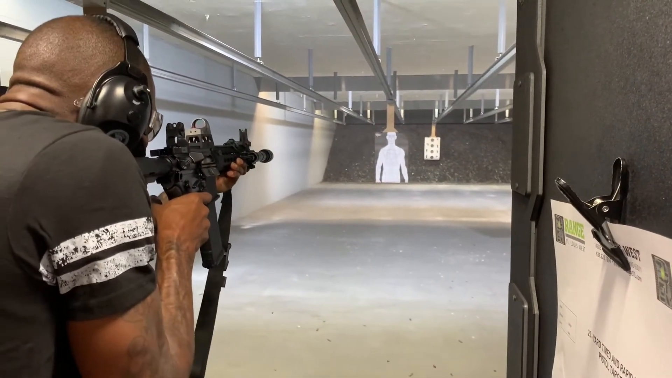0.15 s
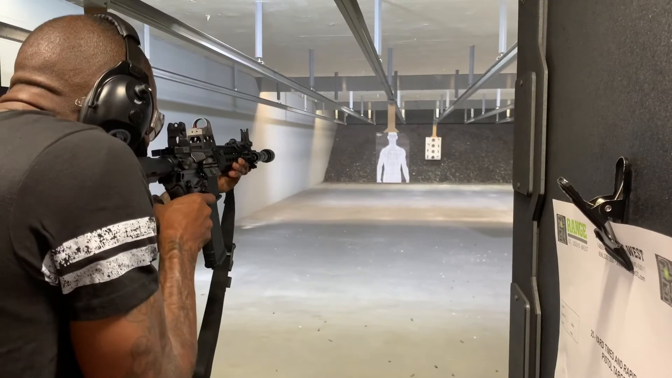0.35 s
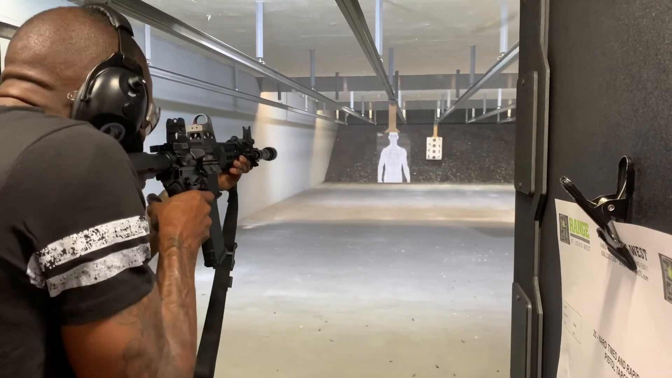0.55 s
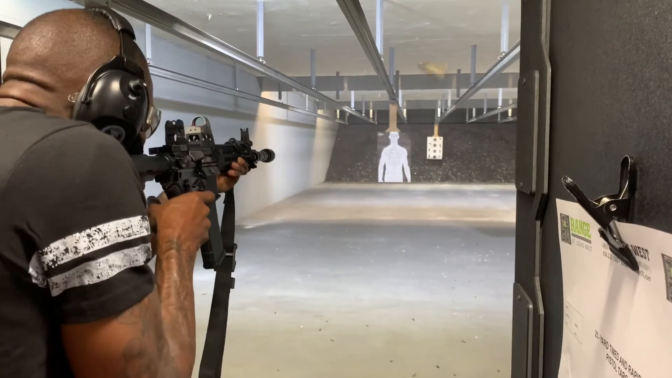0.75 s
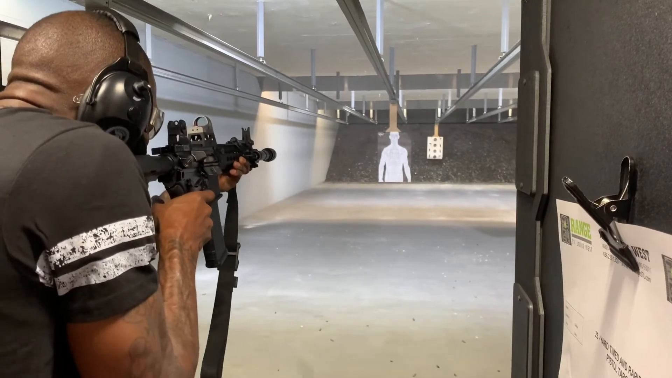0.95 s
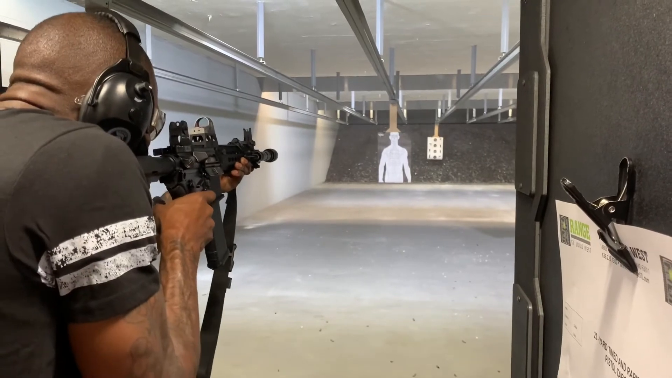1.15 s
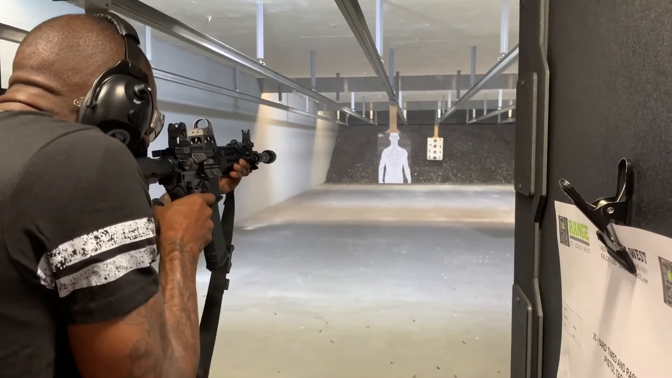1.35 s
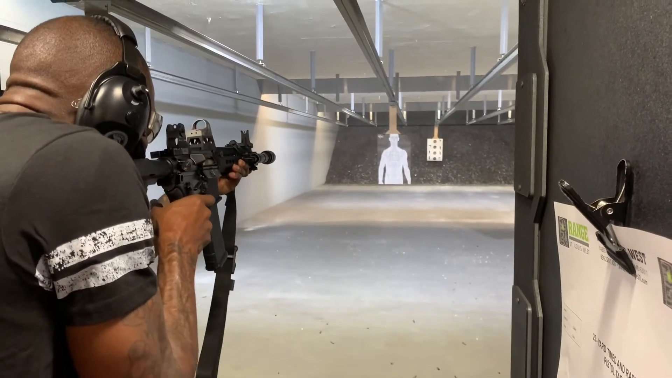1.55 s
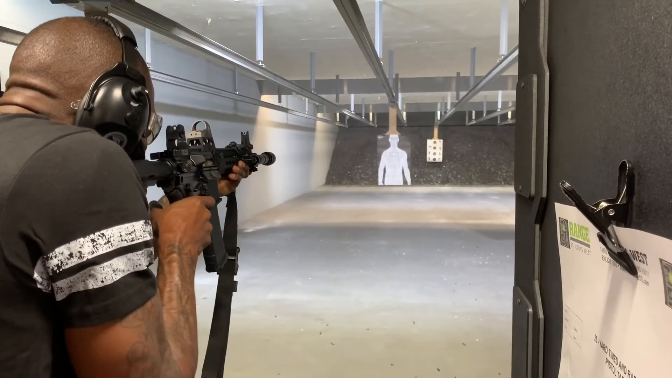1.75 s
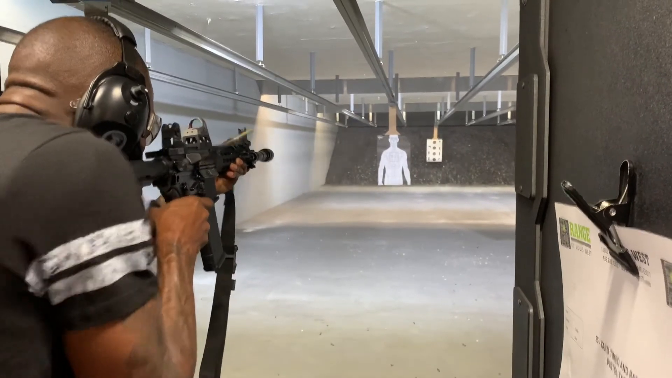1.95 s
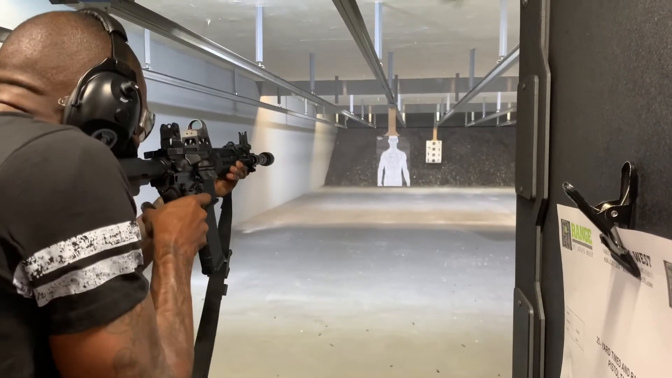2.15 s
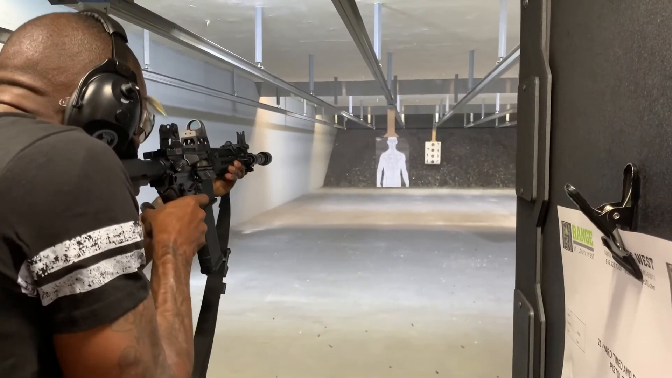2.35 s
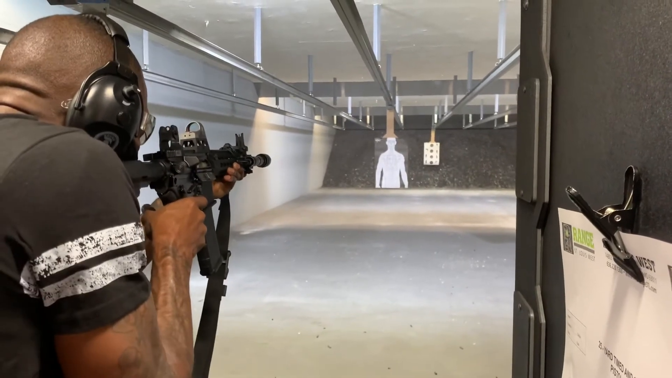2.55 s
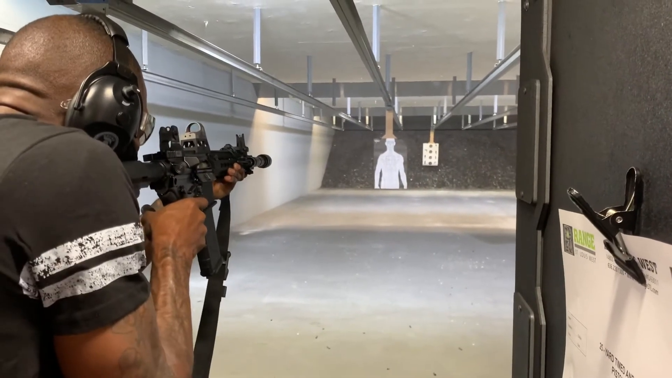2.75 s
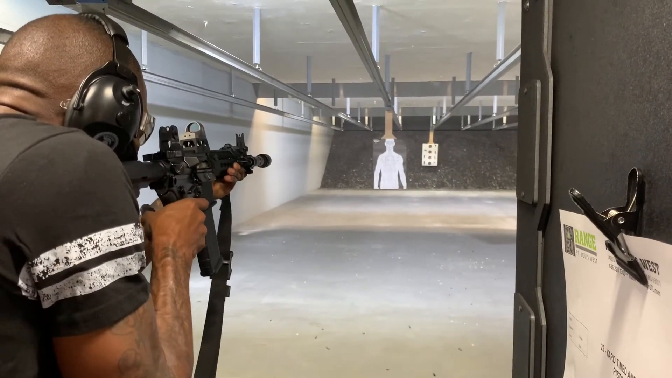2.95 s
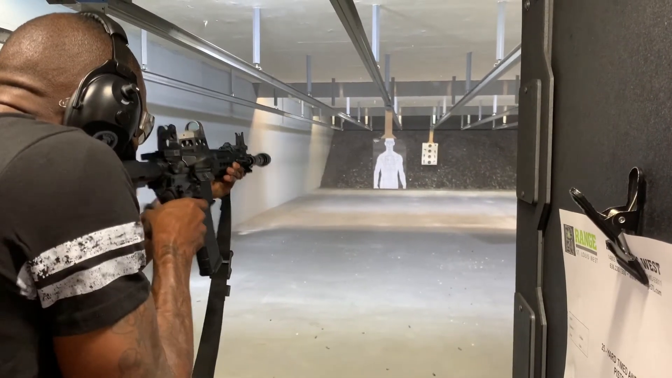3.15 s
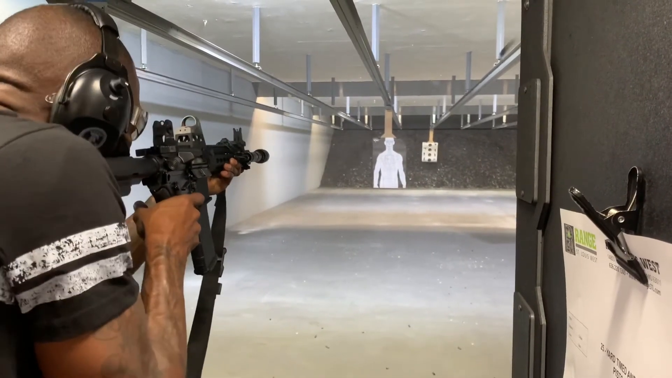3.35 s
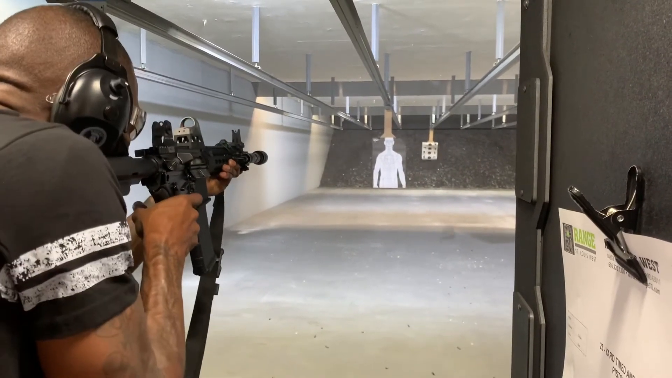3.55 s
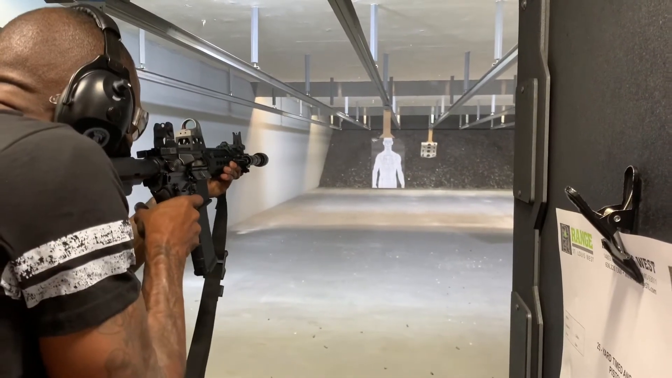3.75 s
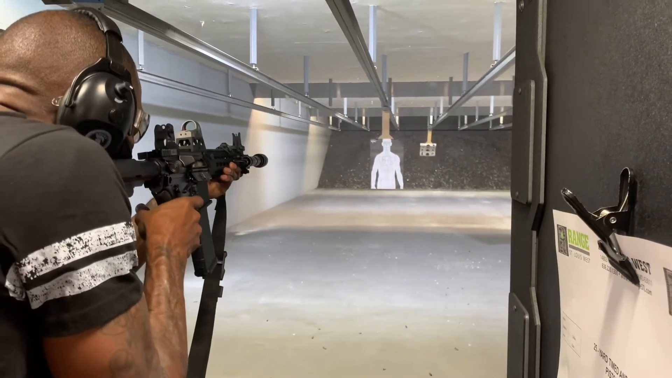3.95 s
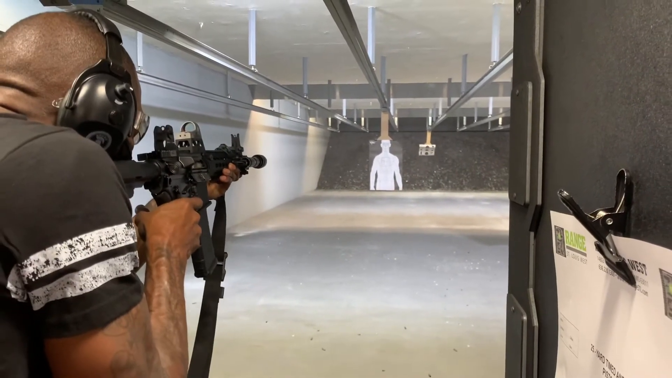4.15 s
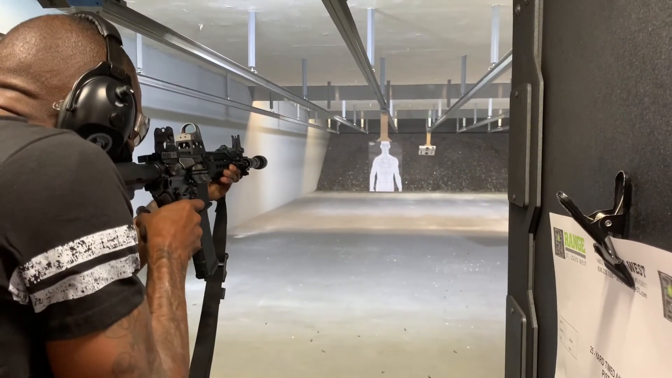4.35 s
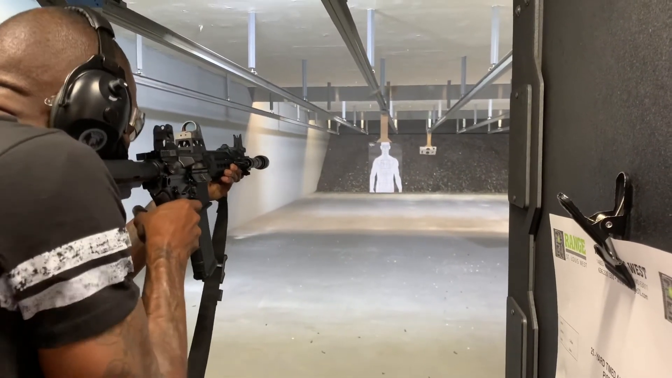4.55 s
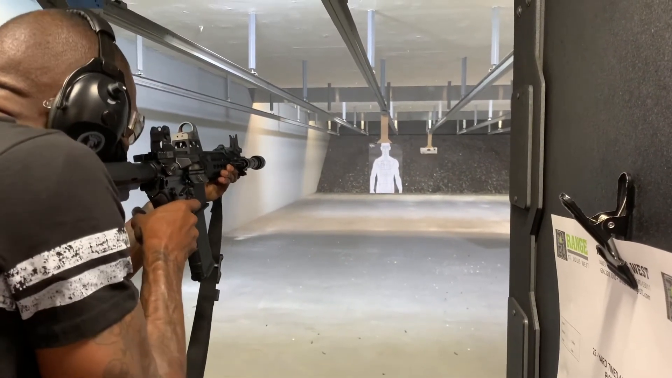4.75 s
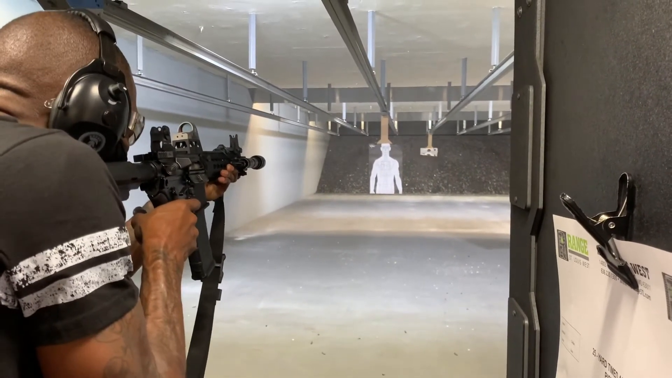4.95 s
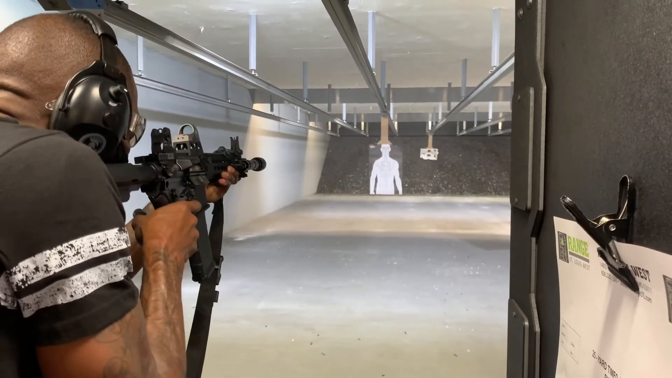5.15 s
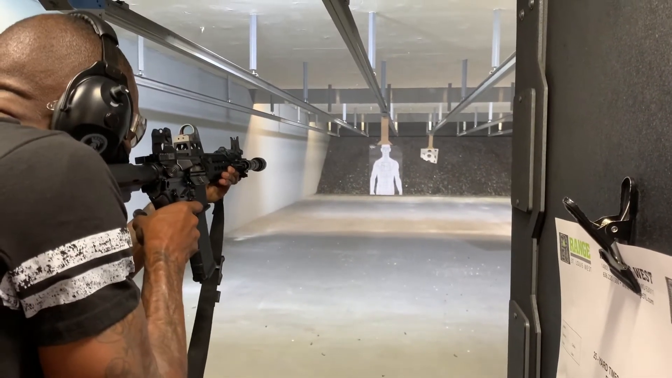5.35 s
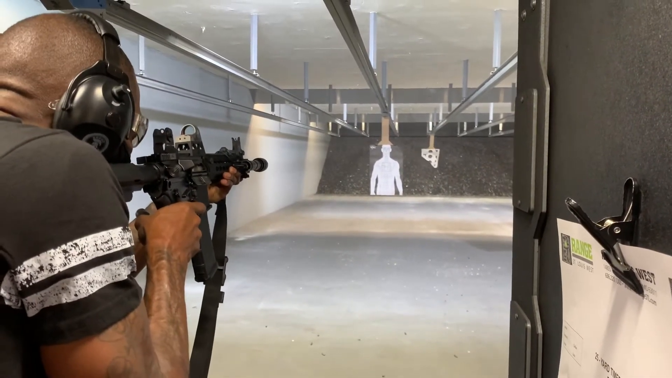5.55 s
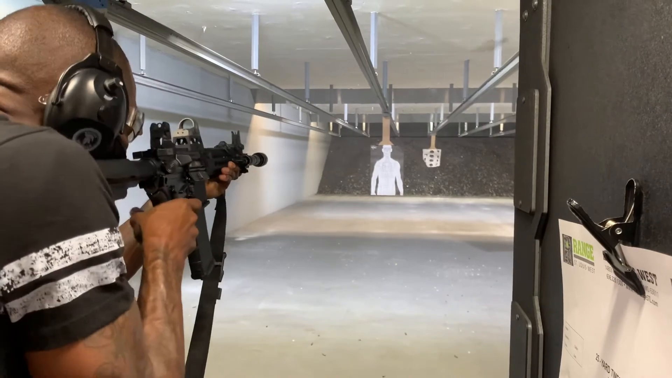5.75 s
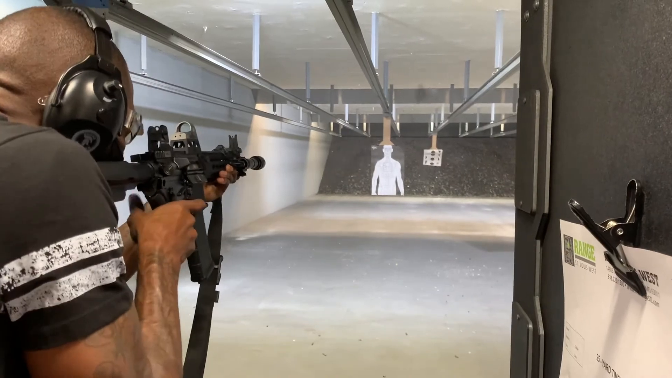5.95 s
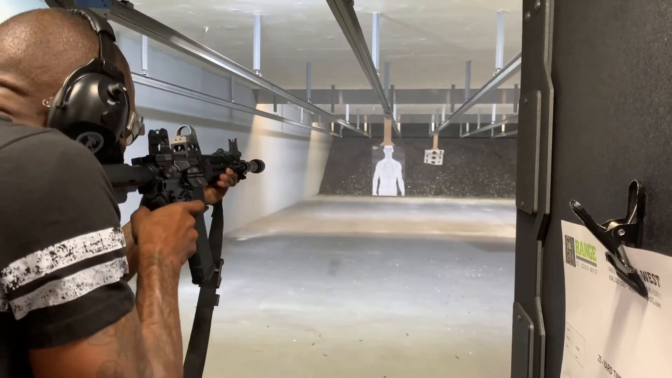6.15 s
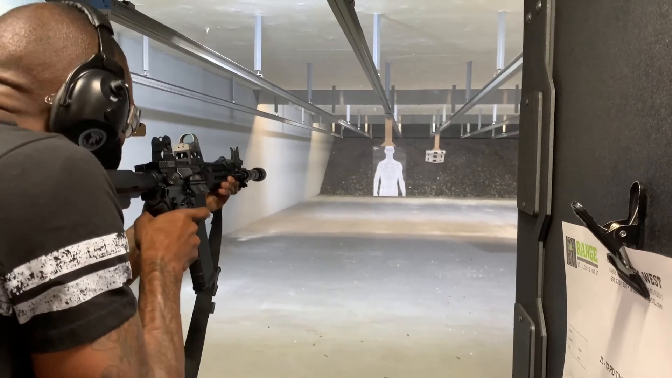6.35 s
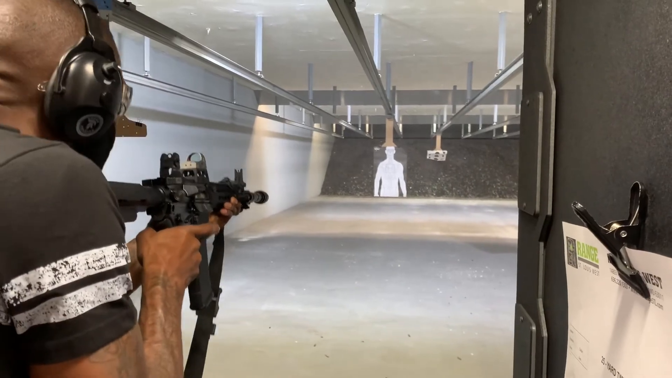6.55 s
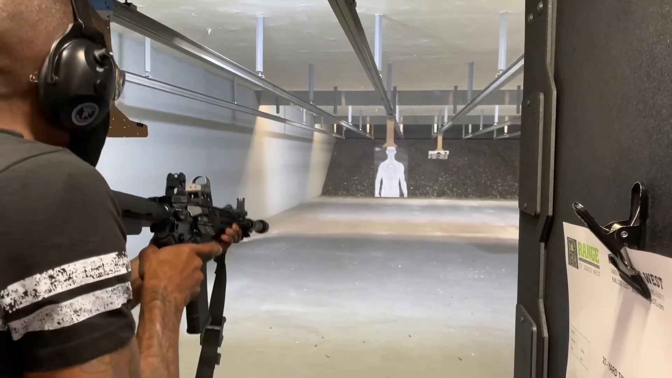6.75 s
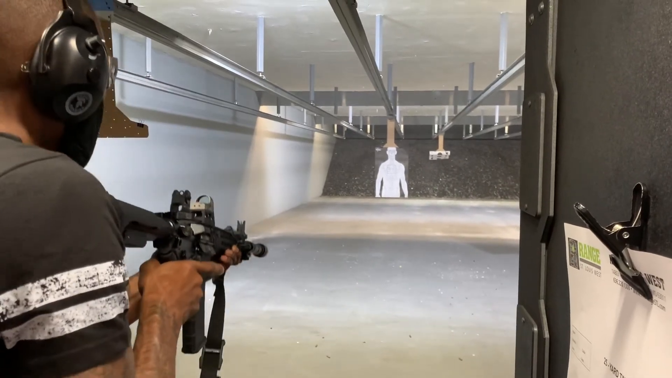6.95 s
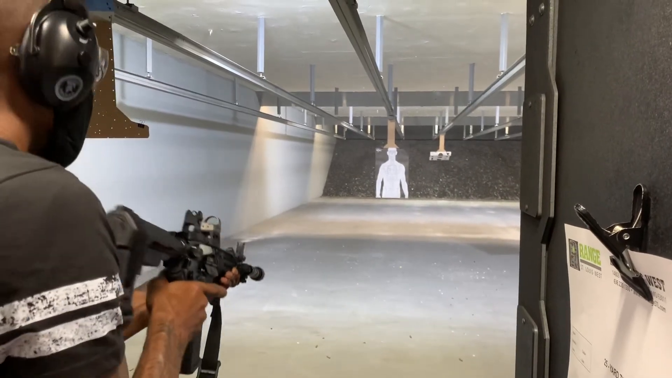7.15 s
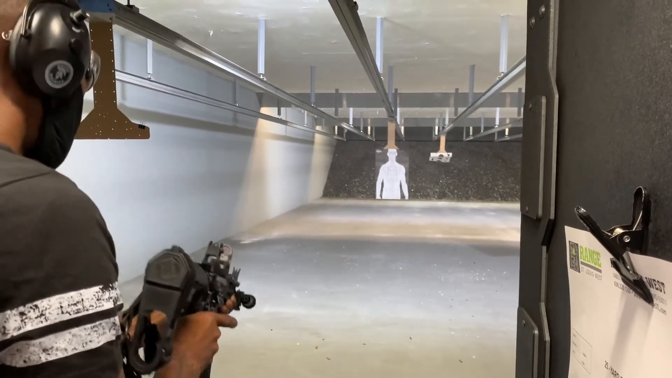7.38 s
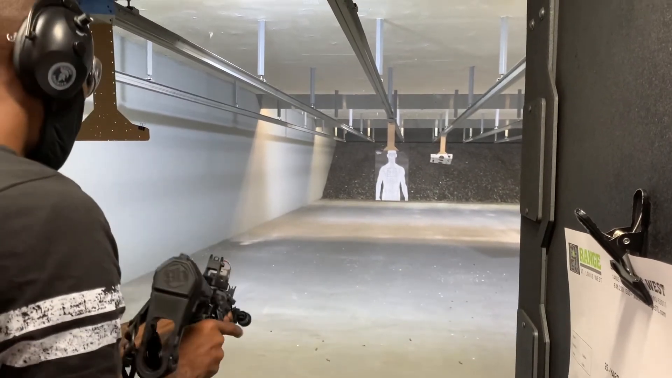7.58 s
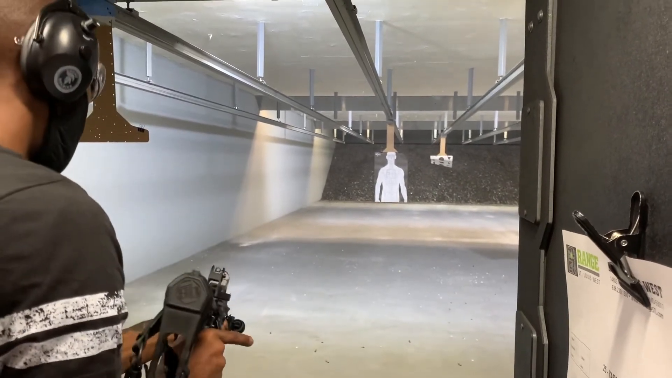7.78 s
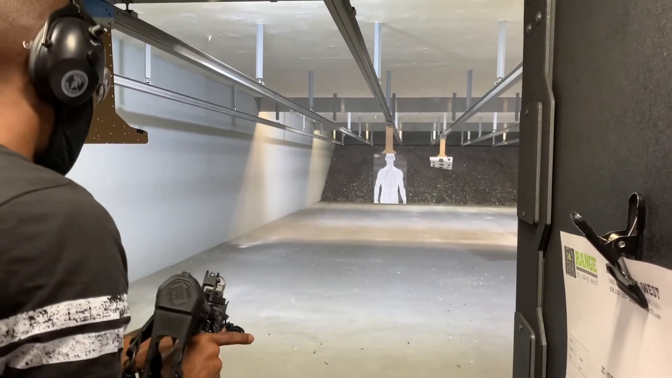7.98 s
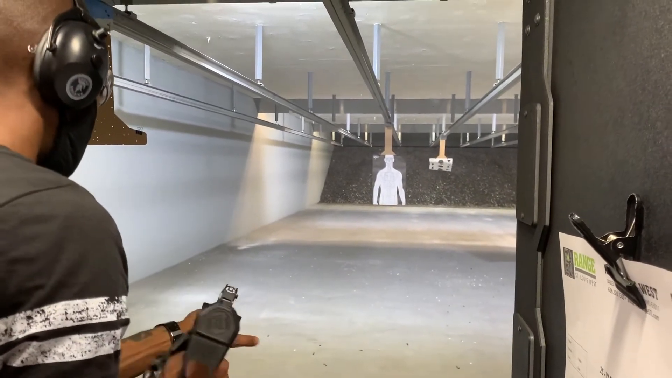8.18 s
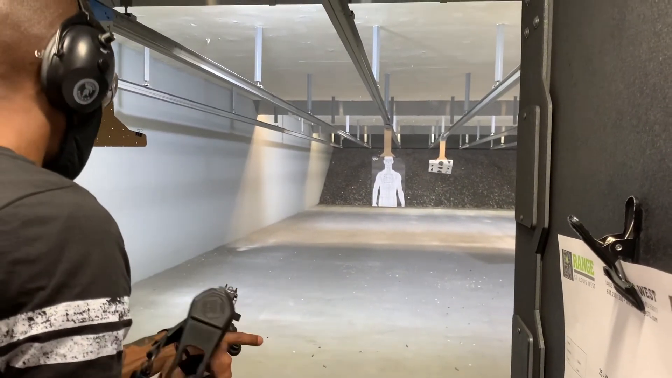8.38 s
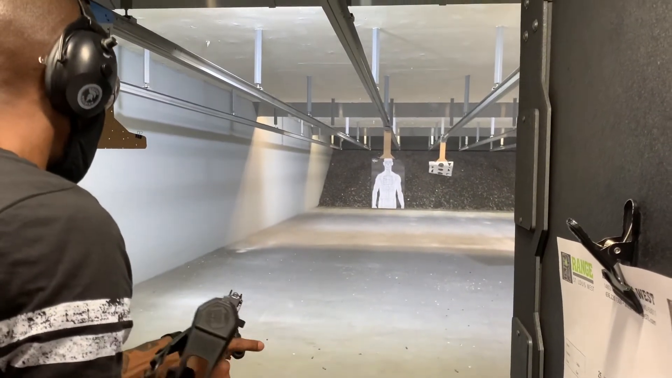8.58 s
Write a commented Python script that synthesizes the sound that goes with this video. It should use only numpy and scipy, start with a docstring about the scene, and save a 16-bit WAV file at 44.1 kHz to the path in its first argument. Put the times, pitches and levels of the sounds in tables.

```python
"""Gunshots in an indoor range: five from a near lane, after the tail of an earlier one, then one from
another gun in a far lane. Each blast is a treble crack followed by the reverberation of a long concrete
hall; near blasts also excite standing waves and a bass pulse that runs between the end walls.
Spent brass cases strike the floor and ring in their modes, over the steady rush of the ventilation.
A phone's two microphones receive it all through gain control and soft overload."""
import sys
import numpy as np
from scipy import signal
from scipy.fft import rfft, irfft, next_fast_len
from scipy.io import wavfile
from scipy.ndimage import uniform_filter1d, minimum_filter1d

SR = 44100
rng = np.random.default_rng(int(sys.argv[2]) if len(sys.argv) > 2 else 0)


def wrap_up_sound(samples):
    """Save the sound to the file named by the first command line argument, as 16-bit audio."""
    columns = np.atleast_2d(samples).T
    # keep every value between -1 and 1, then stretch to whole-number steps
    tamed = np.clip(columns, -1, 1)
    steps = np.round(tamed * 32767).astype(np.int16)
    wavfile.write(sys.argv[1], SR, steps)


N = 380141

# muzzle blasts: (t/s, level/dB, lane: 0 near or 1 far)
SHOT_EVENTS = [(-.83, -1.5, 0), (.337, -2.8, 0), (1.856, -2.8, 0), (3.0845, -2.8, 0), (4.354, -2.8, 0),
               (5.524, -2.8, 0), (7.776, -3.5, 1)]
# tone colour of the shots as heard, in bands about an octave wide: (f/Hz, early level/dB, late level/dB)
NEAR_COLOUR = [(34, -32, -40), (58, -9, -31), (100, -13, -31), (150, -10, -21.5), (220, -11.5, -17.5),
               (420, -13, -12), (760, -11, -12), (1100, -9.5, -13), (1750, -8.5, -14.5), (2400, -14, -17.5),
               (3200, -11, -15.5), (4300, -12, -18), (5500, -12.5, -17), (8300, -14, -19),
               (10500, -11, -14.5), (16000, -16, -23)]
FAR_COLOUR = [(30, -54, -52), (50, -13, -27), (110, -6, -35), (180, -13, -27), (280, -10, -16),
              (420, -15, -18.5), (700, -8, -12), (1000, -6, -8.5), (1250, -8, -10), (1600, -13, -17),
              (1950, -8.5, -16), (2400, -15, -18), (3200, -15, -17.5), (6000, -20, -21), (8300, -22, -22),
              (10500, -19, -18), (16000, -23, -30)]
# likeness of shots from one lane: (f/Hz, correlation with the lane's echo pattern)
PATTERN_CORRELATION = [(100, .93), (400, .97), (900, .93), (1800, .84), (3500, .66), (6500, .45),
                       (16000, .2)]
# build-up as reflections accumulate: (f/Hz, share of the amplitude that gathers later)
LATE_SHARE = [(150, .3), (500, .4), (1200, .55), (2500, .45), (5000, .2), (12000, .05)]
# slow decay of the coupled rooms behind: (f/Hz, level/dB re the late level)
COUPLED_ROOMS = [(100, -30), (330, -19.5), (700, -21), (1500, -20), (3000, -29), (5000, -42), (9000, -80)]
# standing waves of the hall: (f/Hz, relative level/dB, T60/s)
STANDING_WAVES = [(52.5, -7, 1.6), (56, -5, 1.6), (88, 1, .9), (145, -8, 1.3), (183, -6, 1.9), (223, 1, .9),
                  (262, -6, 1.5), (288, -2, 1.3), (307, -12, 2.8), (346, -11, 3.2), (364, -7, 3.4),
                  (399, 1, 1.4), (422, -5, 2.0), (495, -7, 1.5), (552, 3, 1.1), (645, -15, 1.6),
                  (712, -12, 1.5), (893, -8, 1.6), (1000, -5, 1.0), (1100, -7, 1.2), (1195, -8, 1.0),
                  (1615, -9, 1.2), (1808, -10, 1.2), (2027, -10, 1.2)]
# the first row is a very faint, brief treble hiss, the others are case impacts:
# (t/s, level/dB, shift of the lower modes/dB, relative tick level/dB, factor on T60)
HISS_AND_IMPACTS = [(.249, -80, -4, 6, .5), (1.156, -47, -20, -10, .65), (1.578, -62, -8, -18, 1.1),
                    (1.653, -63, -20, -30, 1.2), (2.754, -47, -20, -10, .6), (2.973, -53, -22, -10, .7),
                    (3.799, -48, -22, -10, .8), (4.112, -72, -8, -14, 1.1), (4.327, -70, -10, -12, 1.1),
                    (5.174, -56, -20, -12, .9), (6.38, -70, -14, -2, .8), (6.67, -65, 1, -22, 1.2),
                    (6.776, -68, -6, -30, 1.1)]
# modes of a free brass case: (f/Hz, relative level/dB, T60/s)
CASE_MODES = [(7300, -10, .5), (10700, 0, .5), (11150, -8, .45), (14900, -4, .45), (15080, -4, .45),
              (15300, -13, .2)]
# ventilation noise: (f/Hz, relative spectral density level/dB)
VENT_SPECTRUM = [(20, -36), (38, -14), (55, -6.5), (90, -18), (180, -16), (290, -15.5), (360, -10.5),
                 (430, -14), (520, -15), (1000, -18), (2000, -26.5), (3000, -31), (4500, -34.5),
                 (8000, -48), (11000, -52), (16000, -72)]
# diffuse sound at the two microphones: (f/Hz, left-right correlation)
MIC_CORRELATION = [(35, .9), (70, .4), (120, .99), (200, .95), (300, .7), (700, .3), (3000, .35),
                   (6000, .4), (16000, .5)]
# balance of the microphones: (f/Hz, left level/dB re right)
MIC_BALANCE = [(150, -.5), (600, .8), (2500, .6), (5000, -.6), (12000, 0)]

NEAR, FAR = 0, 1  # pairs of settings below are (near, far)
SHOT_SAMPLES, FRAME, HOP = 3 * SR, 1024, 256
RISE_S, BUILD_UP_S = (.0045, .006), .022
CRACK_HZ, CRACK_DB, CRACK_T60, CRACK_RISE_S = 3500, (-20, -30), .07, .0035
BOOTH_T60, WALL_T60, COUPLED_T60 = .26, (2.0, 1.7), 3.6  # s
PANEL_HZ, PANEL_T60 = 160, 5.0  # panels absorb below this frequency
HOLLOW_HZ, HOLLOW_OCTAVES, HOLLOW_SHARE = 360, .6, .07  # dip in the wall absorption
AIR_T60, AIR_EXPONENT = 1.3, 1.8  # s at 10 kHz, growth of the loss with frequency
BACKSTOP_DELAY_S, BACKSTOP_RISE_S, BACKSTOP_T60 = .1, .06, .44  # echo of the far end
BACKSTOP_DB, BACKSTOP_TILT_DB = (-7, -10), (-4.2, -1.2)  # re the late level near 1 kHz, per octave
THROB_DB, THROB_HZ = 3.5, 350  # bass swells once a round trip, below this frequency
PULSE_HZ, PULSE_HALF_WIDTH_S, PULSE_DB = 64, .016, -13.5
FIRST_ARRIVAL_S, ROUND_TRIP_S, TRIP_GAIN_DB = .03, .103, -6
MODES_DB, VENT_DB = -17.3, -57
LEFT_LEAD_S, BAND_LIMIT_HZ = 20 / SR, 16400


def gunshots(mix, lane, resonance):
    """Fixed geometry gives a lane one echo pattern; its treble varies as gun and air move."""
    envelope = reverberant_envelope(lane)
    t = np.arange(SHOT_SAMPLES) / SR
    rise = 1 - np.exp(-(t / RISE_S[lane]) ** 2)
    pattern = diffuse_field(SHOT_SAMPLES)
    correlation = at_frequency(PATTERN_CORRELATION, np.fft.rfftfreq(SHOT_SAMPLES, 1 / SR))
    for start, db, _ in (shot for shot in SHOT_EVENTS if shot[2] == lane):
        noise = irfft(blend(pattern, diffuse_field(SHOT_SAMPLES), correlation))
        frames = signal.stft(noise, nperseg=FRAME, noverlap=FRAME - HOP)[2]
        frames *= envelope[:, :frames.shape[2]]
        echoes = signal.istft(frames, nperseg=FRAME, noverlap=FRAME - HOP)[1][:, :SHOT_SAMPLES]
        add(mix, start, gain_of(db) * (rise * (resonance + echoes) + direct_crack(lane)))


def direct_crack(lane):
    """Direct sound: the treble front of the blast, a fast-decaying burst of noise."""
    t = np.arange(SHOT_SAMPLES) / SR
    hiss = filtered_noise(2, CRACK_HZ, "highpass", len(t))
    rise = 1 - np.exp(-(t / CRACK_RISE_S) ** 2)
    return hiss * gain_of(CRACK_DB[lane] - 60 * t / CRACK_T60) * rise


def reverberant_envelope(lane):
    """Incoherent reflections add in power; returns their amplitude over frequency and time."""
    hz = np.fft.rfftfreq(FRAME, 1 / SR)[:, None]
    t = np.arange(SHOT_SAMPLES // HOP + 2) * HOP / SR
    bands = np.array(FAR_COLOUR if lane == FAR else NEAR_COLOUR)
    early_db, late_db = at_frequency(bands[:, [0, 1]], hz), at_frequency(bands[:, [0, 2]], hz)
    early = gain_of(early_db - 60 * t / BOOTH_T60)
    late = gain_of(late_db - 60 * t / reverberation_time(hz, lane))
    backstop_db = late_db + BACKSTOP_DB[lane] + BACKSTOP_TILT_DB[lane] * np.log2((hz + 60) / 1000)
    age = t - BACKSTOP_DELAY_S
    backstop = np.clip(age / BACKSTOP_RISE_S, 0, 1) * gain_of(backstop_db - 60 * age / BACKSTOP_T60)
    coupled = gain_of(late_db + at_frequency(COUPLED_ROOMS, hz) - 60 * t / COUPLED_T60)
    envelope = np.sqrt(early ** 2 + late ** 2 + backstop ** 2 + coupled ** 2)
    envelope *= 1 - at_frequency(LATE_SHARE, hz) * np.exp(-(t / BUILD_UP_S) ** 2)
    if lane == NEAR:
        swell = np.cos(2 * np.pi * (t - FIRST_ARRIVAL_S) / ROUND_TRIP_S)
        envelope *= gain_of(THROB_DB * swell / (1 + (hz / THROB_HZ) ** 2))
    envelope *= np.sqrt(SR / (hz + 20))  # octave-band level to spectral density
    envelope *= 1 - .45 * np.exp(-t * hz / 3)  # bass builds up more slowly
    clumps = uniform_filter1d(rng.standard_normal(envelope.shape), size=5, axis=0)
    clumps = uniform_filter1d(clumps, size=7, axis=1)  # walls and baffles reflect unevenly
    return envelope * gain_of(1.8 * clumps / clumps.std() - .45)


def reverberation_time(hz, lane):
    """The decay rates due to wall, panel and air absorption add; T60 is the reciprocal of the sum."""
    hollow = HOLLOW_SHARE * np.exp(-(np.log2((hz + 1) / HOLLOW_HZ) / HOLLOW_OCTAVES) ** 2)
    walls = (1 - hollow) / WALL_T60[lane]
    panels = 1 / PANEL_T60 / (1 + (hz / PANEL_HZ) ** 4)
    air = (hz / 10000) ** AIR_EXPONENT / AIR_T60
    return 1 / (walls + panels + air)


def hall_modes():
    """Standing waves decay freely after the blast; higher ones differ in phase between microphones."""
    t = np.arange(SHOT_SAMPLES) / SR
    phases = np.pi * rng.uniform(-1, 1, (len(STANDING_WAVES), 2, 1))
    ring = 0
    for (hz, db, t60), phase in zip(STANDING_WAVES, phases):
        spread = min((hz / 450) ** 2, 1)
        ring += gain_of(db - 60 * t / t60) * np.sin(2 * np.pi * hz * t + spread * phase)
    return gain_of(MODES_DB) * ring * (1 - np.exp(-t / .02))


def flutter_echo():
    """Repeated reflection: a bass pulse returns from the end walls, weaker on each round trip."""
    trip = np.arange(8)[:, None]
    t = np.arange(SR) / SR - FIRST_ARRIVAL_S - trip * ROUND_TRIP_S
    pulses = np.exp(-(t / PULSE_HALF_WIDTH_S) ** 2) * np.sin(2 * np.pi * PULSE_HZ * t)
    train = (gain_of(PULSE_DB + TRIP_GAIN_DB * trip) * pulses).sum(0)
    return np.pad(train, (0, SHOT_SAMPLES - SR)) * gain_of([[2], [-2]])  # louder on the left


def hiss_and_cases(mix):
    """After one faint hiss, impacts excite a tick and each case's damped modes, wavering as it spins."""
    t = np.arange(SR // 2) / SR
    attack_s = .002
    attack = np.minimum(t / attack_s, 1)
    for start, db, lower_db, tick_db, t60_factor in HISS_AND_IMPACTS:
        draws = rng.uniform(-1, 1, (4, len(CASE_MODES))).T  # each landing strikes another spot
        grit = filtered_noise(3, 350, "lowpass", len(t))
        chatter = grit / grit.std() * (.35 + .8 * np.exp(-t / .025))  # on rough concrete
        ring = 0
        for (hz, mode_db, t60), (detune, phase, spin, strike) in zip(CASE_MODES, draws):
            struck_db = mode_db + 4 * strike + lower_db * (hz < 13000)
            decay = gain_of(struck_db - 60 * t / (t60 * t60_factor))
            waver = .7 + .4 * np.sin(np.pi * phase + 2 * np.pi * (30 + 12 * spin) * t)
            ring += decay * np.sin(2 * np.pi * hz * (1 + .005 * detune) * t) * (waver + chatter)
        hiss = filtered_noise(2, [9000, 15000], "bandpass", len(t))
        tick = hiss * gain_of(tick_db + 3 - 60 * t / .09)
        add(mix, start - attack_s, gain_of(db) * (ring * gain_of([[1], [-1]]) + tick) * attack)


def ventilation():
    """Stationary broadband noise of the air handlers, heard as a diffuse field."""
    size = next_fast_len(N)
    colour = gain_of(at_frequency(VENT_SPECTRUM, np.fft.rfftfreq(size, 1 / SR)))
    rush = irfft(diffuse_field(size) * colour, size)[:, :N]
    return gain_of(VENT_DB) * rush / rush.mean(0).std()


def diffuse_field(size):
    """Partial coherence: noise spectra at two microphones; the common part reaches the left first."""
    hz = np.fft.rfftfreq(size, 1 / SR)
    left, independent = rfft(rng.standard_normal((2, size)))
    delayed = left * np.exp(-2j * np.pi * hz * LEFT_LEAD_S)
    right = blend(delayed, independent, at_frequency(MIC_CORRELATION, hz))
    return np.array([left, right]) * gain_of(at_frequency(MIC_BALANCE, hz) / 2 * [[1], [-1]])


def blend(a, b, correlation):
    """Uncorrelated spectra add in power, so these weights conserve it."""
    return correlation * a + np.sqrt(1 - correlation ** 2) * b


def filtered_noise(order, hz, kind, size):
    """Two independent channels of filtered white noise."""
    return signal.lfilter(*signal.butter(order, hz, kind, fs=SR), rng.standard_normal((2, size)))


def gain_of(db):
    """Level to amplitude ratio."""
    return 10 ** (np.asarray(db) / 20)


def at_frequency(table, hz):
    """Interpolation on a logarithmic frequency axis."""
    f, value = np.transpose(table)
    return np.interp(np.log(hz + 1), np.log(f + 1), value)


def add(mix, start, sound):
    """Superposes a two-channel sound at start seconds; what lies outside the mix is cut."""
    at = round(start * SR)
    part = mix[:, max(at, 0):][:, :sound.shape[1] + min(at, 0)]
    part += sound[:, max(-at, 0):][:, :part.shape[1]]


def scene():
    """Linear superposition of all sources at the microphones."""
    mix = ventilation()
    gunshots(mix, NEAR, resonance=hall_modes() + flutter_echo())
    gunshots(mix, FAR, resonance=0)
    hiss_and_cases(mix)
    return mix


def record(dry):
    """Compression: gain drops at a blast, holds and recovers; soft saturation and a low-pass follow."""
    threshold_db, slope, hold_s = -11.5, .9, .37
    level_db = 10 * np.log10(abs(uniform_filter1d((dry ** 2).mean(0), size=1500)) + 1e-12)
    half_hold = round(hold_s * SR / 2)
    held_db = -minimum_filter1d(-level_db, size=2 * half_hold + 1, origin=half_hold)
    fall_db = 35 * np.arange(N) / SR  # the tracked level falls by at most 35 dB/s
    tracked_db = np.maximum.accumulate(held_db + fall_db) - fall_db
    excess_db = np.maximum(tracked_db - threshold_db, 0)
    ducked = dry / gain_of(slope * uniform_filter1d(excess_db, size=500))
    saturated = 1.3 * np.tanh(ducked / 1.3)
    lowpass = signal.firwin(511, BAND_LIMIT_HZ, window=("kaiser", 9), fs=SR)
    return signal.oaconvolve(saturated, lowpass[None], "same", axes=1)


dry = scene()
out = record(dry)
wrap_up_sound(out)
```